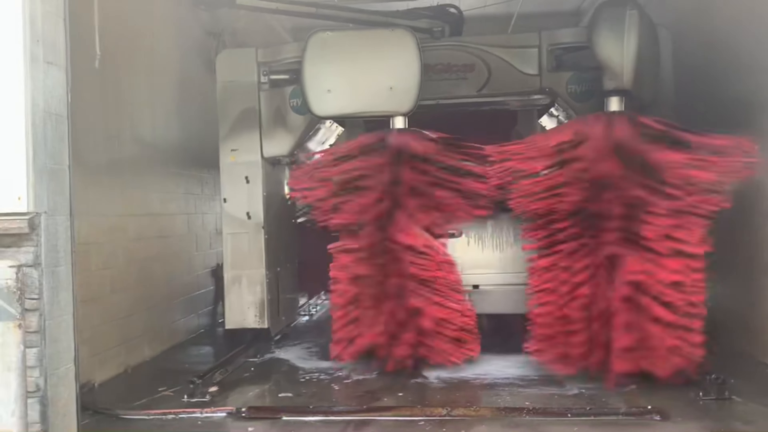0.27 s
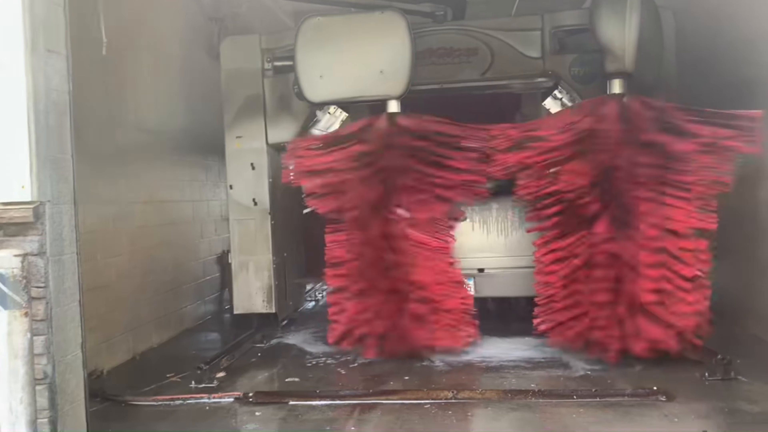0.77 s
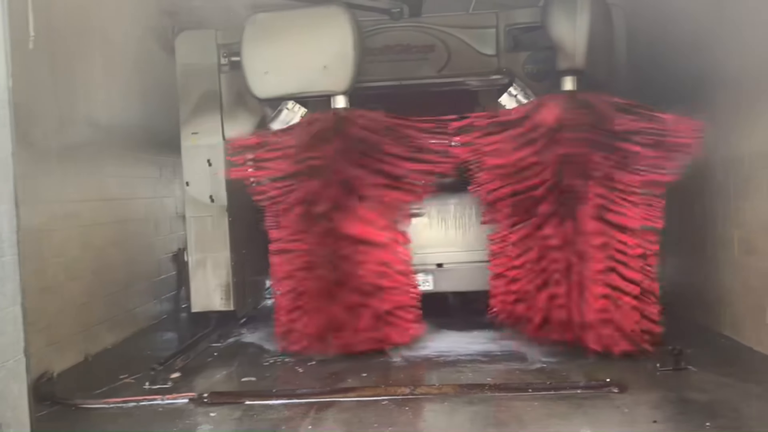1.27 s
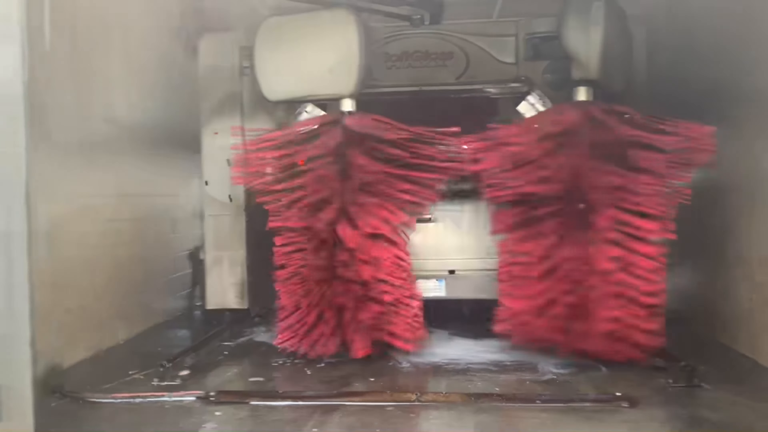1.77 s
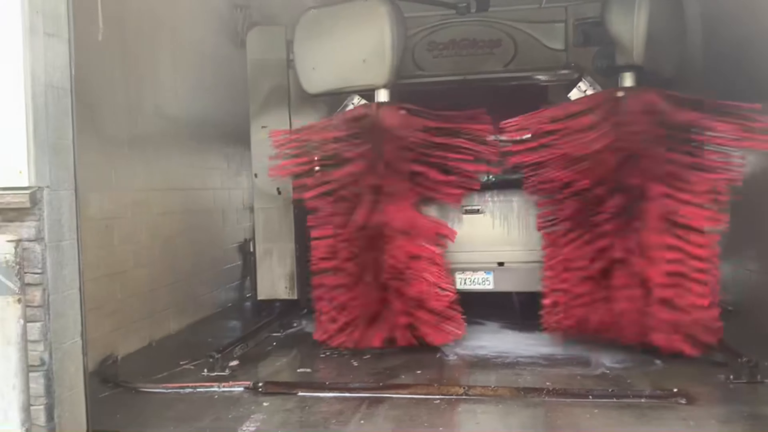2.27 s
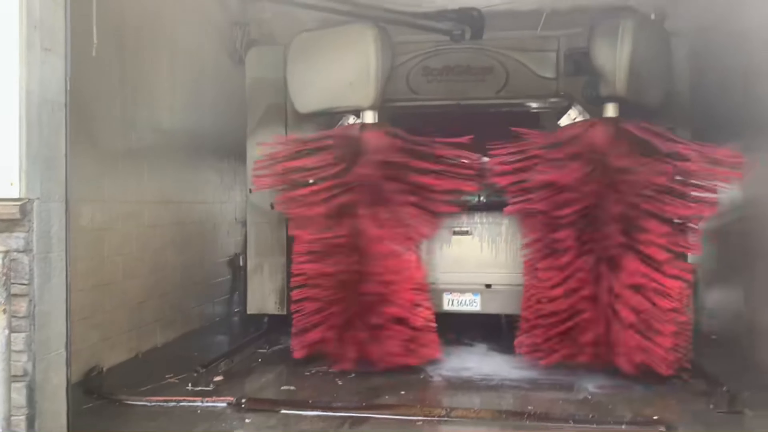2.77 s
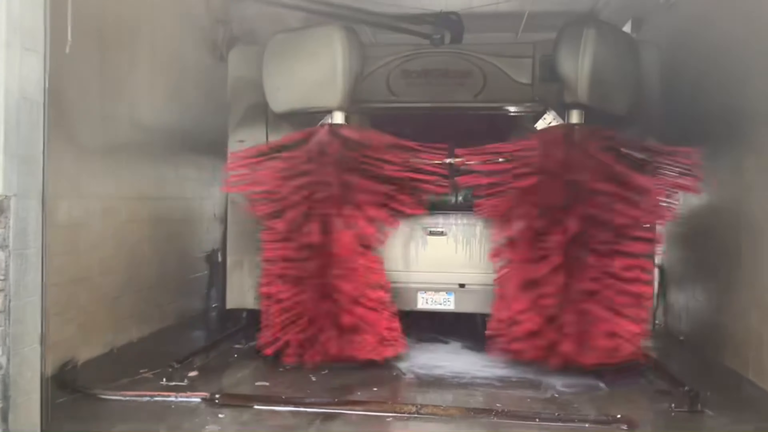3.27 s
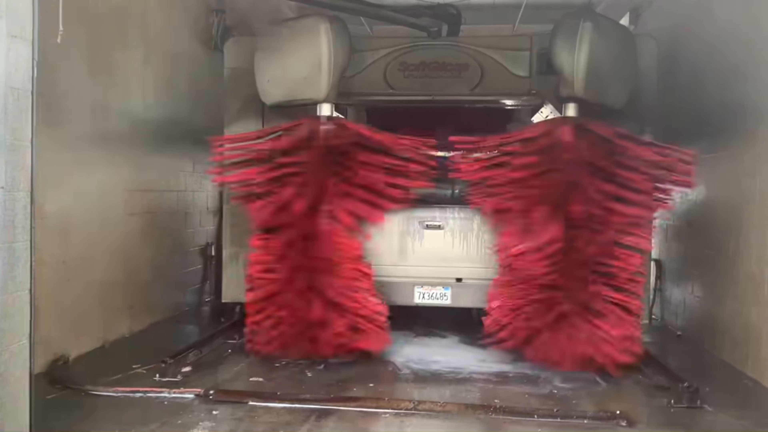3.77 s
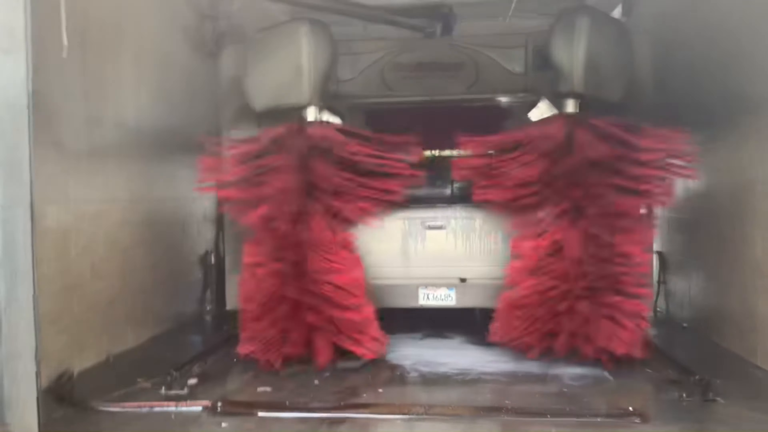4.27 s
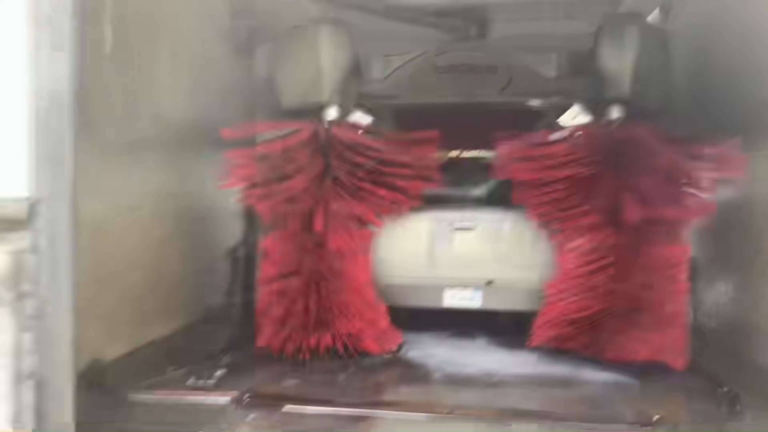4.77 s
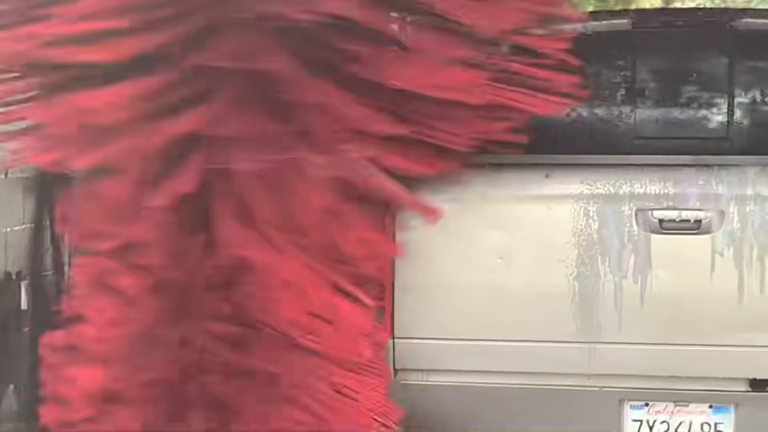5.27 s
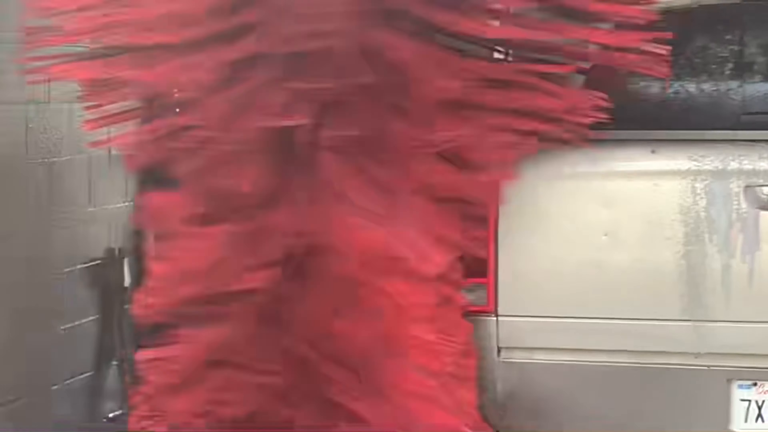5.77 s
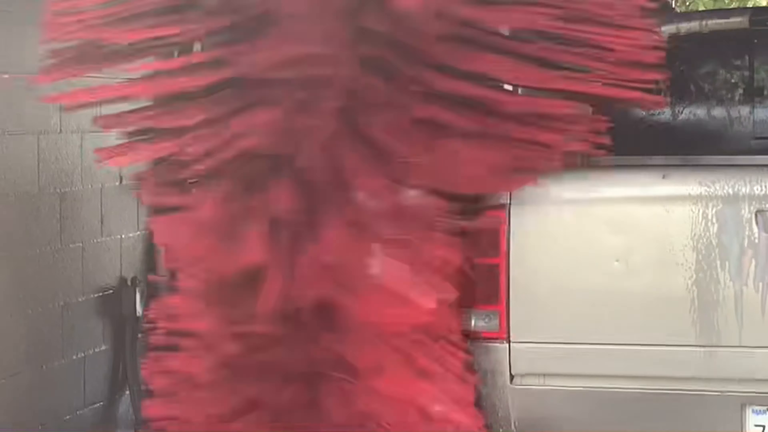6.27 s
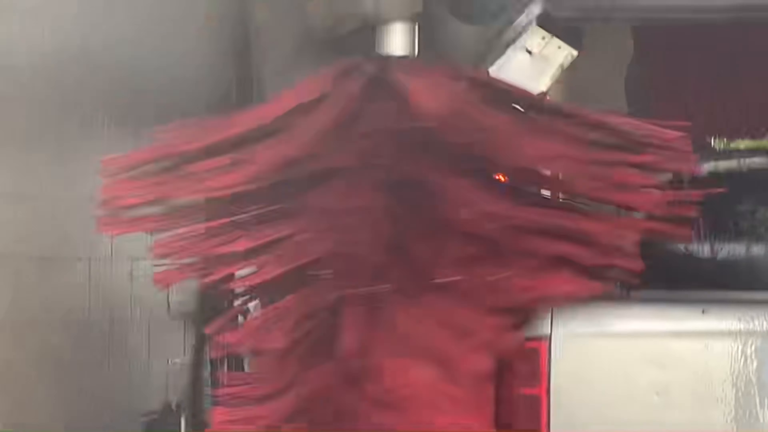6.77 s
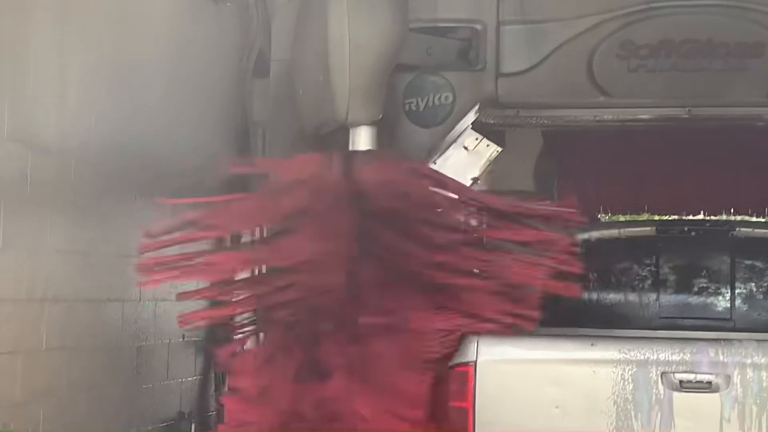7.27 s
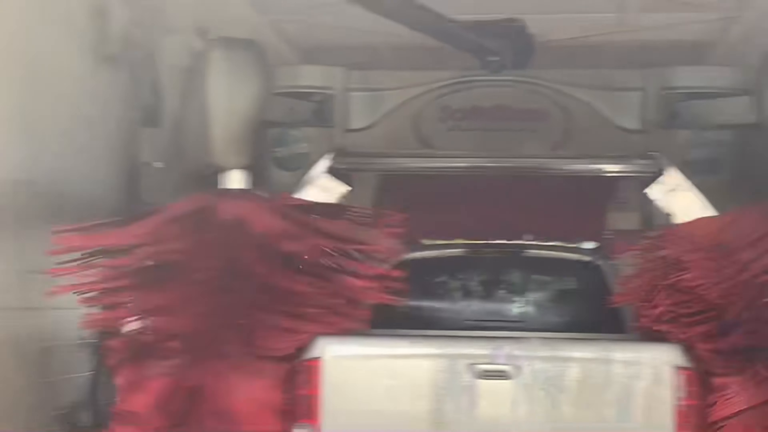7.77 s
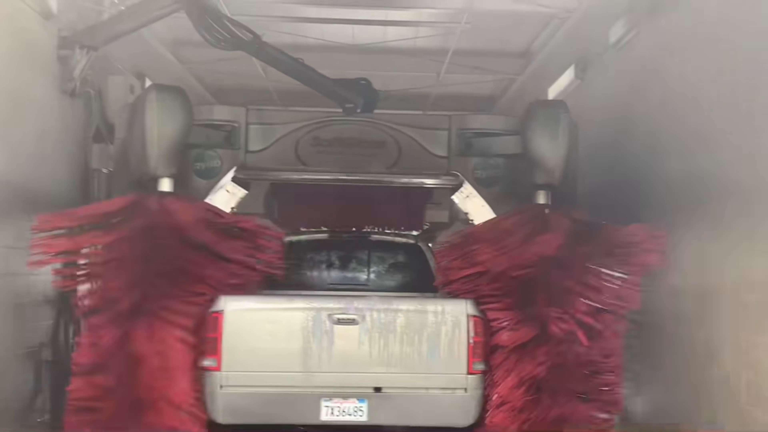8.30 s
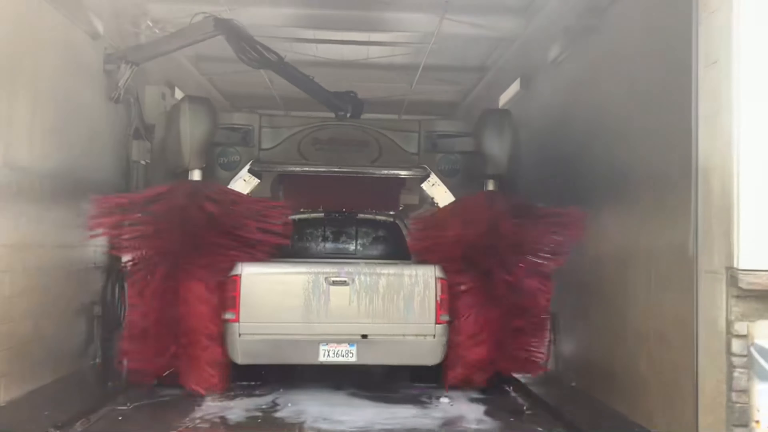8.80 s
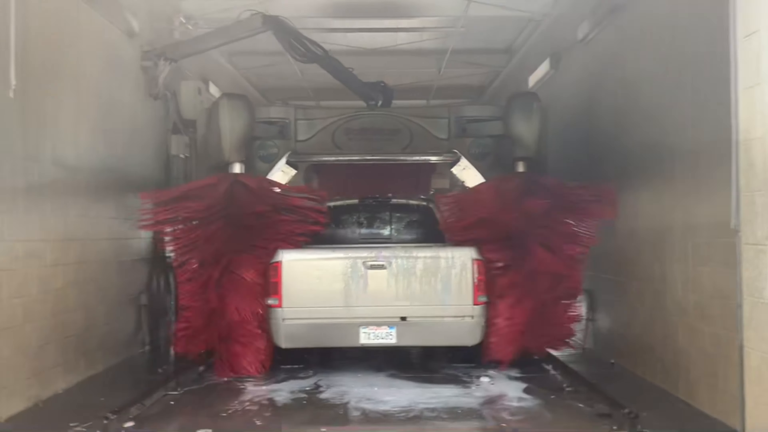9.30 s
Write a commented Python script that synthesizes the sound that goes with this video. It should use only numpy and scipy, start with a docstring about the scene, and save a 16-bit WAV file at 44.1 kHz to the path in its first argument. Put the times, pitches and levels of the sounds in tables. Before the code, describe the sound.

Wet cloth brushes whirl against a pickup in an echoing wash bay, drumming on metal panels amid swishing, water spray and motor hum.

```python
"""A concrete wash bay, heard by a phone at the entrance: two cloth brushes work round a pickup's tail.
Wet strips drum on ringing body panels, scrub over the paint and swish at their tips, all as shaped random blows.
Sliding bands of noise make the whips and the hollow leaning; heavier bunches smack and thud.
Nozzles spray, flung water bursts and drive motors hum; dense echoes smear the brushes into a roar."""
import sys
import numpy as np
from scipy import signal
from scipy.fft import rfft, irfft, next_fast_len
from scipy.io import wavfile
from scipy.ndimage import uniform_filter1d, map_coordinates

SR = 44100
rng = np.random.default_rng(int(sys.argv[2]) if len(sys.argv) > 2 else 0)


def output_pcm(signal):
    """Save a mono or channel-first signal as 16-bit PCM at the path in sys.argv[1].

    Samples are clipped to [-1, 1] before scaling.
    """
    pcm = np.clip(np.atleast_2d(signal).T, -1, 1) * 32767
    wavfile.write(sys.argv[1], SR, np.round(pcm).astype(np.int16))


N = 420713
TIME = np.arange(N) / SR  # s
# mean rate at which rows of strips come round on each brush
LEFT_FLAP_HZ, RIGHT_FLAP_HZ = 5.27, 7.6


def undb(db):
    """Decibels to gain."""
    return np.exp(np.asarray(db) * (np.log(10) / 20))


def unit(x):
    """Scale to rms 1."""
    return x / np.sqrt(np.mean(x ** 2))


def curves(table):
    """The columns of a time table, one value a sample."""
    s, *columns = np.transpose(table)
    return [np.interp(TIME, s, column) for column in columns]


def over_hz(table, f):
    """Read a table of (f/Hz, value) on a log-frequency axis, held flat beyond its ends."""
    hz, value = np.transpose(table)
    return np.interp(np.log(f), np.log(hz), value)


def filtered(x, response):
    """Pass x through a frequency response, given as a function of Hz."""
    size = next_fast_len(N, True)
    f = np.maximum(np.arange(size // 2 + 1) * SR / size, 1)
    return irfft(rfft(x, size) * response(f), size)[..., :N]


def colour(x, spectrum):
    """Filter x by a curve of (f/Hz, level/dB), at rms 1."""
    return unit(filtered(x, lambda f: undb(over_hz(spectrum, f))))


def ring(x, modes):
    """Let x ring resonances of (f/Hz, width/Hz, level/dB) whose powers add, at rms 1."""
    def response(f):
        power = 0
        for hz, width_hz, db in modes:
            detune = (f / hz - hz / f) * hz / width_hz
            power = power + undb(db) ** 2 / (1 + detune ** 2) ** 1.5
        return np.sqrt(power)
    return unit(filtered(x, response))


def walk(rate):
    """A random drift of spread near 1, heading for a new value `rate` times a second."""
    knots = rng.standard_normal(1024)
    return 1.2 * np.interp(TIME * rate, np.arange(len(knots)), knots)


def beat(hz):
    """An uneven beat, -1..1, whose rate wanders round hz."""
    return np.sin(2 * np.pi * np.cumsum(hz * (1 + .1 * walk(4))) / SR)


def burst(s, attack_s, decay_s):
    """An envelope that rises at time s and dies away."""
    age = np.maximum(TIME - s, 0)
    return (1 - np.exp(-age / attack_s)) * np.exp(-age / decay_s)


def impacts(per_s, spread_db):
    """Random tiny blows of uneven strength, in two unrelated streams at rms 1."""
    hit = rng.random((2, N), dtype=np.float32) < per_s / SR
    size = undb(spread_db * np.minimum(rng.standard_exponential((2, N), dtype=np.float32), 4))
    return unit(hit * size * rng.standard_normal((2, N), dtype=np.float32))


def rubbing(hz, width_hz):
    """Friction noise in one band whose centre moves and wobbles, at rms 1."""
    soften = signal.butter(1, min(width_hz / 2, SR / 4), fs=SR, output="sos")
    grain = signal.sosfilt(np.vstack([soften, soften]), rng.standard_normal((2, N)))
    # low-passed noise on a carrier becomes a band round the carrier
    carrier = np.sin(2 * np.pi * np.cumsum(hz * (1 + .03 * walk(12))) / SR)
    return unit(grain * carrier)


def patchy(x, depth_db, per_s, patch_hz, size=512):
    """Let patches of the spectrum flutter on their own; per_s is how fast, patch_hz how wide."""
    f, t, bands = signal.stft(x.astype(np.float32), SR, nperseg=size)
    places = np.meshgrid(f / patch_hz, t * per_s, indexing="ij")
    flutter = map_coordinates(rng.standard_normal((size, size)), places, order=1, mode="wrap")
    gain = undb(depth_db * flutter).astype(np.float32)
    return signal.istft(bands * gain, SR)[1][..., :N]


def hum(hz, waver=0.02007, rough=0.37):
    """A motor tone whose pitch wavers; its rough share (0-1 of the power) judders and smears it."""
    rough = np.clip(rough, 0, 1)
    phase = 2 * np.pi * np.cumsum(hz * (1 + waver * walk(9))) / SR
    judder = walk(16) * np.sin(phase) + walk(16) * np.cos(phase)
    return np.sqrt(2 * (1 - rough)) * np.sin(phase) + np.sqrt(rough) * judder


# low growl of the gantry motor: [f/Hz, level/dB]
GANTRY_RUMBLE = [(20, -33), (31, -26), (40, -24), (50, -5.5), (60, -4.5), (78, -1.5), (98, -11.5),
                 (125, -9), (200, -11), (500, -49)]
# the gantry drive eases as the brushes turn the corners: [t/s, level/dB]
GANTRY_LOAD = [(0, -21), (1.1, -26.5), (1.5, -25), (2.2, -27), (3.0, -24), (4.0, -28), (4.4, -31),
               (5.0, -28.5), (6.1, -31), (6.9, -28), (9.54, -26.5)]
# the two brush drives swell and sink: [t/s, lower hum level/dB, upper hum level/dB]
BRUSH_HUM = [(0, -28, -32), (1.1, -34.5, -34.5), (1.9, -33, -30), (2.5, -32, -36), (3.3, -31, -39),
             (4.3, -42, -34), (6, -40, -27.5), (6.8, -31.5, -32), (8, -36, -31), (8.6, -36.5, -38),
             (9.54, -44, -52)]
# the gantry throbs steadily at the left brush's mean row rate: depth either way, time of a peak
THROB_DB, THROB_AT_S = 2, 0.12


def motors():
    """The gantry rumbles, hums and throbs under its load; two brush drives hum beside it."""
    load_db, = curves(GANTRY_LOAD)
    throb = undb(THROB_DB * np.cos(2 * np.pi * LEFT_FLAP_HZ * (TIME - THROB_AT_S)))
    rumble = undb(-0.5) * colour(rng.standard_normal((2, N)), GANTRY_RUMBLE)
    tone = undb(-4.5) * hum(82, waver=0.03, rough=0.27)
    gantry = (rumble + tone) * throb * undb(load_db)
    lower_db, upper_db = curves(BRUSH_HUM)
    return gantry + undb(lower_db) * hum(123.6) + undb(upper_db) * hum(204.2)


# the spray drops while the truck screens the nozzles: [t/s, level/dB]
SPRAY_LEVEL = [(0, -34), (.5, -28.5), (1.07, -29.5), (1.13, -27), (2.2, -29.5), (4.4, -29.5), (5.15, -30),
               (5.45, -35), (6.2, -36.5), (6.72, -34), (6.82, -33), (9.54, -33.5)]
# patter of coarse drops: [f/Hz, level/dB]
DROP_SPECTRUM = [(1000, 5), (3000, -5), (5000, 1.5), (7000, 4), (9000, -5.5), (12000, 1), (16000, -10)]
# hiss of fine mist, which also colours the splats: [f/Hz, level/dB]
MIST_SPECTRUM = [(3000, 1.5), (6000, -5), (8300, 1), (10500, 3), (12500, -3.5), (14500, -6), (16000, -9)]
# faint uneven nozzle pulses: mean rate, depth either way
NOZZLE_HZ, NOZZLE_DB = 2.9, .2


def spray():
    """Nozzles pulse; coarse drops patter as sparser blows, and dense fine mist flickers over them."""
    spray_db, = curves(SPRAY_LEVEL)
    drops = colour(impacts(24000, spread_db=2.0), DROP_SPECTRUM) * undb(-4.0)
    mist = colour(impacts(32000, spread_db=2.0), MIST_SPECTRUM) * undb(-3.0 + 0.65 * walk(28))
    water = patchy(drops + mist, depth_db=2.0, per_s=24, patch_hz=920)
    return water * undb(spray_db + NOZZLE_DB * beat(NOZZLE_HZ))


# flung water hitting the wall and floor: [t/s, level/dB, decay/s]
WATER_SLUGS = [(.218, -28, .018), (.274, -25, .015), (.421, -27, .02), (.463, -27, .02),
               (1.225, -28, 0.019), (1.284, -28, .018), (1.39, -26, .02), (3.255, -27, .018),
               (3.43, -25, .025), (3.905, -28, 0.017), (4.33, -27, .039), (4.74, -28, .015),
               (6.578, -31, .025), (6.812, -24, 0.012), (7.24, -30, .02)]


def splats():
    """Slugs of water burst into a short shower of drops: bright noise in quick bursts."""
    shower = sum(undb(db) * burst(s, 0.0015, decay_s) for s, db, decay_s in WATER_SLUGS)
    return shower * colour(rng.standard_normal((2, N)), MIST_SPECTRUM)


# hollow ring of cloth leaning on the tailgate: [t/s, centre f/Hz, width/Hz, level/dB]
HOLLOW_RING = [(0, 780, 520, -30), (.9, 770, 503, -29), (1.15, 675, 300, -30), (1.55, 790, 475, -26),
               (1.8, 800, 520, -35), (2.0, 780, 500, -29.5), (2.6, 770, 520, -26.5), (2.74, 740, 450, -34),
               (2.87, 740, 330, -26.5), (3.2, 850, 500, -26.5), (3.55, 910, 470, -24),
               (4.15, 930, 560, -28), (4.65, 830, 600, -30.5), (5.25, 750, 500, -29.5),
               (5.6, 950, 597, -39.5), (9.54, 1000, 600, -40.5)]
# width of the ring under firm and under loose contact
NARROW_HZ, WIDE_HZ = 152, 640


def leaning():
    """Cloth pressed on the tailgate rings hollow; narrow and wide bands blend as contact loosens."""
    hz, width_hz, db = curves(HOLLOW_RING)
    width_hz = np.clip(width_hz, NARROW_HZ, WIDE_HZ)
    wide = np.clip((width_hz - NARROW_HZ) / (WIDE_HZ - NARROW_HZ), 0, 1)
    firm = np.sqrt(1 - wide) * rubbing(hz, NARROW_HZ)
    loose = np.sqrt(wide) * rubbing(hz, WIDE_HZ)
    return (firm + loose) * undb(db)


# cloth dragging over paint: [f/Hz, level/dB]
SCRUB_SPECTRUM = [(200, -34), (450, 0.5), (560, -1), (670, -7), (820, -2), (1060, -1), (1300, -5.5),
                  (1700, -10.5), (2400, -9.5), (5000, -33)]


def scrubbing(flap):
    """Cloth sticks and slips on the paint: dense small blows, pulsing slightly with the brush."""
    return colour(impacts(9000, spread_db=0.3), SCRUB_SPECTRUM) * undb(0.15 * flap)


# strips catching an edge and whipping along it; the row at 2.95 s is a long, broad splash of strip tips: #
# [t/s, level/dB against the swish, first f/Hz, last f/Hz, width/Hz, decay/s]
EDGE_WHIPS = [(.24, 5, 1470, 1600, 800, 0.53), (1.09, -0.5, 3600, 4790, 2400, 0.31),
              (2.95, -12, 5170, 5200, 1410, 1.5), (4.08, -2, 1805, 2195, 1100, .22),
              (4.26, 5, 2750, 3700, 1800, .28), (4.47, -3.5, 4200, 3950, 1480, 0.44),
              (4.62, -3.5, 3730, 3420, 1000, .4), (5.19, 0, 3176, 2900, 554, .15)]


def whips():
    """A strip catches an edge and hisses along it; its pitch slides as it pulls free. One long, broad band is a
    splash of tips instead."""
    out = 0
    for s, db, from_hz, to_hz, width_hz, decay_s in EDGE_WHIPS:
        hz = np.interp(TIME, [s, s + 2 * decay_s], [from_hz, to_hz])
        out = out + undb(db) * burst(s, 0.017, decay_s) * rubbing(hz, width_hz)
    return out


# strip tips landing flat on the tailgate: [f/Hz, level/dB]
SPLASH_SPECTRUM = [(700, -15.5), (1500, -3.5), (2100, -8), (2900, -10), (3500, -12), (4500, -11.5),
                   (7000, -18), (14000, -45)]
# strip tips whipping along the sides: [f/Hz, level/dB]
SWISH_SPECTRUM = [(1000, -11), (1600, 2), (2200, -2.5), (2600, -1), (3200, 2.5), (3900, 1), (4600, -3.5),
                  (7000, -11.5), (14000, -61)]
# hiss of tips dragged along the flank: centre, width, mean level against the swish
DRAG_HZ, DRAG_WIDTH_HZ, DRAG_DB = 2950, 820, -7


def swishing(flap, side):
    """Strip tips splash flat on the tailgate, then swish brighter and narrower along the sides."""
    splash = np.sqrt(1 - side) * colour(impacts(14000, spread_db=0.5), SPLASH_SPECTRUM)
    swish = np.sqrt(side) * colour(impacts(15000, spread_db=1.0), SWISH_SPECTRUM) * undb(-1.0)
    drag = side * rubbing(DRAG_HZ, DRAG_WIDTH_HZ) * undb(DRAG_DB + 0.71 * walk(18))
    return (splash + swish + drag + whips()) * undb(.5 * flap + 0.51 * walk(20))


# light bunches land at random: rate, decay, share of the cloth's power (0-1)
CLUMPS_PER_S, CLUMP_DECAY_S, CLUMP_SHARE = 26, .02, .25


def clumping():
    """Wet strips stick together and land in bunches: a gain that jumps and falls back with each."""
    lands = (rng.random(N) < CLUMPS_PER_S / SR) * rng.random(N)
    decay = np.exp(-1 / (CLUMP_DECAY_S * SR))
    swell = uniform_filter1d(signal.lfilter([1], [1, -decay], lands), size=256)
    share = np.clip(CLUMP_SHARE, 0, 1)
    return np.sqrt(1 - share + share * np.abs(swell) / swell.mean())


# heavy bunches hitting the truck: [t/s, panel thud level/dB, wet smack level/dB]
HEAVY_SLAPS = [(1.39, -18, -30), (2.11, -21, -21), (3.44, -17.5, -25), (3.595, -14, -20), (4.135, -21, -19),
               (4.305, -14, -25), (4.945, -15, -31), (5.895, -20, -33), (7.185, -23, -24.5)]
# wet smack of cloth: [f/Hz, level/dB]
SMACK_SPECTRUM = [(300, -10), (800, 0), (1700, -3), (3500, -13), (6500, -11), (12000, -32)]
# resonances of the side panels, also used by the drumming: [f/Hz, width/Hz, level/dB]
SIDE_PANEL_MODES = [(183, 86, -3.5), (269, 97, -1), (361, 64, -2.5), (441, 118, -6)]


def slaps():
    """A heavy bunch of strips smacks the truck, and the panels thud."""
    thud = sum(undb(db) * burst(s, 0.0071, 0.054) for s, db, _ in HEAVY_SLAPS)
    smack = sum(undb(db) * burst(s, 0.0028, 0.034) for s, _, db in HEAVY_SLAPS)
    panel = ring(impacts(3000, spread_db=.5), SIDE_PANEL_MODES)
    cloth = colour(impacts(9000, spread_db=0.5), SMACK_SPECTRUM)
    return thud * panel + smack * cloth


# resonances of the tailgate: [f/Hz, width/Hz, level/dB]
TAILGATE_MODES = [(122.5, 31, -2), (208.4, 59, -0.5), (285, 42, 1), (380, 62, -8.5), (425, 76, -13),
                  (640, 140, -13)]
# boom of the panel under the brush, deepest at the hollow rear corner:
# [t/s, centre f/Hz, level/dB against the drumming]
PANEL_BOOM = [(0, 290, -20), (1.3, 290, -10), (3.3, 290, -10), (3.75, 345, -9.5), (4.3, 335, -6),
              (4.55, 205, -4), (5.0, 178, -3.5), (5.5, 195, -9), (5.95, 285, -5), (6.7, 260, -16),
              (7.3, 425, -3), (8.0, 420, -14.5), (9.0, 320, -11), (9.54, 300, -13)]


def drumming(flap, side):
    """Heavy wet strips ring the tailgate, then the side panels; the metal under the brush booms."""
    slaps_per_s = 2600 * undb(1.2 * flap)
    boom_hz, boom_db = curves(PANEL_BOOM)
    tail = ring(impacts(slaps_per_s, spread_db=-1.5), TAILGATE_MODES)
    flank = ring(impacts(slaps_per_s, spread_db=0.5), SIDE_PANEL_MODES)
    boom = rubbing(boom_hz, width_hz=94) * undb(boom_db)
    return np.sqrt(1 - side) * tail + np.sqrt(side) * flank + boom


BAY_T60_S = 0.78  # time for the echo to fall 60 dB


def bay(x, wet_db, count=5):
    """Direct sound plus dense echo of hard, wet walls; drifting shares move it between echo paths."""
    age = TIME[:SR]
    # decaying noise, silent for the first 8 ms
    echoes = rng.standard_normal((count, 2, SR)) * undb(-60 * age / BAY_T60_S) * (age > .008)
    echoes /= np.sqrt(np.sum(echoes ** 2, axis=2, keepdims=True))
    shares = np.array([walk(5) for _ in echoes])
    shares /= np.sqrt(np.sum(shares ** 2, axis=0))
    walls = 0
    for share, echo in zip(shares, echoes):
        walls = walls + signal.oaconvolve(x * share, echo, axes=1)[:, :N]
    wet = undb(wet_db)
    return (x + wet * walls) / np.sqrt(1 + wet ** 2)


# likeness of the phone's two channels, swinging in the treble: [f/Hz, likeness -1..1]
CHANNEL_LIKENESS = [(30, 0.88), (70, 0.92), (130, 0.98), (350, 0.96), (700, .78), (1100, 0.77),
                    (1900, 0.19), (3100, -0.1), (4500, 0.075), (5600, -0.26), (6600, 0.8), (7400, 0.086),
                    (7900, -1), (9100, -1), (10300, 1), (11700, 1), (12600, -.97), (14300, -1),
                    (14900, .95)]
# balance of the channels: [f/Hz, left minus right level/dB]
CHANNEL_BALANCE = [(60, 0), (200, -0.4), (700, 1.7), (1500, 1.4), (3000, 1.2), (5000, -0.8), (8000, 0)]


def microphones(field):
    """Two unrelated streams become what the channels share and where they differ."""
    def likeness(f):
        return np.clip(over_hz(CHANNEL_LIKENESS, f), -1, 1)
    mid = filtered(field[0], lambda f: np.sqrt((1 + likeness(f)) / 2))
    difference = filtered(field[1], lambda f: np.sqrt((1 - likeness(f)) / 2))
    sign = np.array([[1], [-1]])
    return filtered(mid + sign * difference, lambda f: undb(sign * over_hz(CHANNEL_BALANCE, f) / 2))


# the brushes press in, round the corners and ease off along the sides:
# [t/s, drumming level/dB, scrubbing level/dB, strip-tip swish level/dB]
BRUSH_PRESSURE = [(0, -24.5, -31.5, -31.5), (.35, -26, -30, -35.5), (1.0, -20, -28.5, -30.5),
                  (1.4, -21, -28.5, -29), (2.1, -21, -29.5, -29), (2.7, -20, -28, -30.5),
                  (3.3, -20.5, -30, -29), (3.68, -17.5, -25.5, -27), (4.3, -18.5, -27.5, -27.5),
                  (4.95, -19, -28, -28), (5.5, -21, -30, -31.5), (6.3, -22.5, -29, -35.5),
                  (7.25, -23.5, -27.5, -31.5), (8.1, -25, -29, -33.5), (8.55, -26.5, -32, -34),
                  (8.95, -22, -32, -35), (9.54, -24.5, -31, -31)]
# the brushes travel round the corners:
# [t/s, share of cloth on the side panels 0-1 (the rest on the tailgate), left minus right level/dB]
CORNER_TRAVEL = [(0, 0.01, -0.5), (2.9, 0.07, 0), (3.7, 0.34, 0.1), (4.2, 0.58, 0.7), (4.7, 0.64, -0.3),
                 (6.2, 0.85, -1), (7.4, 0.94, .6), (8.6, 1, 3), (9.54, 0.8, -1.2)]


def scene():
    """Both brushes pulse the drumming; the right one, nearer, also pulses scrubbing and swishing."""
    drum_db, scrub_db, swish_db = curves(BRUSH_PRESSURE)
    side, pan_db = curves(CORNER_TRAVEL)
    side = np.clip(side, 0, 1)
    left, right = beat(LEFT_FLAP_HZ), beat(RIGHT_FLAP_HZ)
    drum = drumming(left / 2 + right, side) * undb(drum_db)
    scrub = scrubbing(right) * undb(scrub_db) + leaning()
    swish = swishing(right, side) * undb(swish_db)
    # the cloth's colour flutters in patches, as every strip sounds its own
    cloth = patchy(scrub, depth_db=2.6, per_s=36, patch_hz=180)
    cloth = cloth + patchy(swish, depth_db=3.6, per_s=28, patch_hz=200)
    roar = bay(drum + cloth * clumping() + slaps(), wet_db=-6.5)
    brushes = microphones(roar) * undb(np.array([pan_db, -pan_db]) / 2)
    # motors and water arrive direct; the air swallows the echo of the fine spray
    return brushes + microphones(motors() + spray() + splats())


def record(dry):
    """The phone cuts the top steeply above 15750 Hz."""
    return signal.sosfilt(signal.ellip(10, .1, 80, 15750, fs=SR, output="sos"), dry)


dry = scene()
out = record(dry)
output_pcm(out)
```